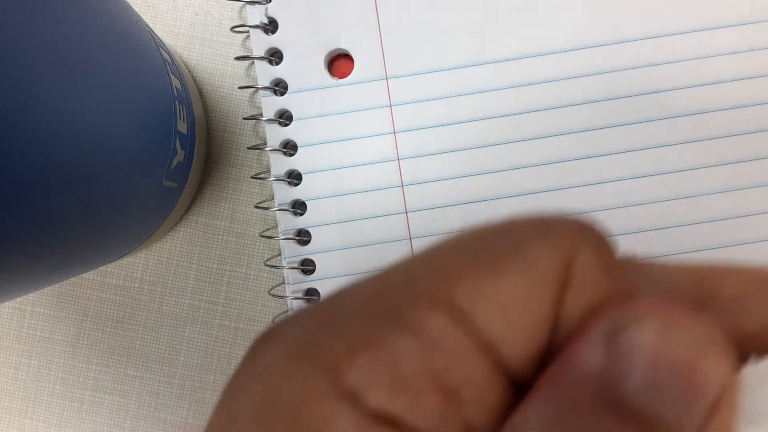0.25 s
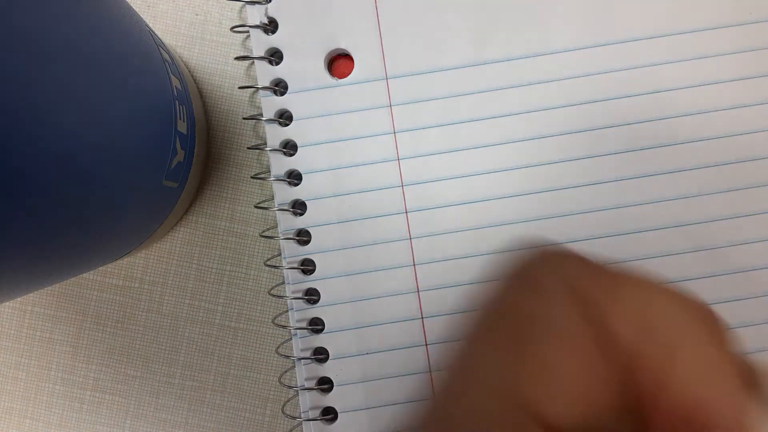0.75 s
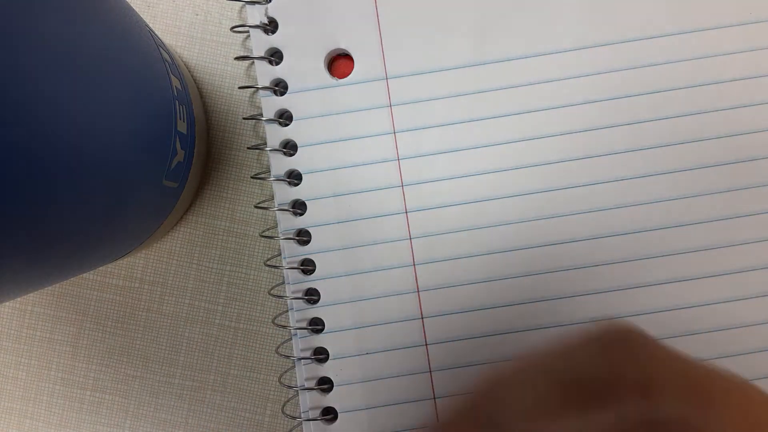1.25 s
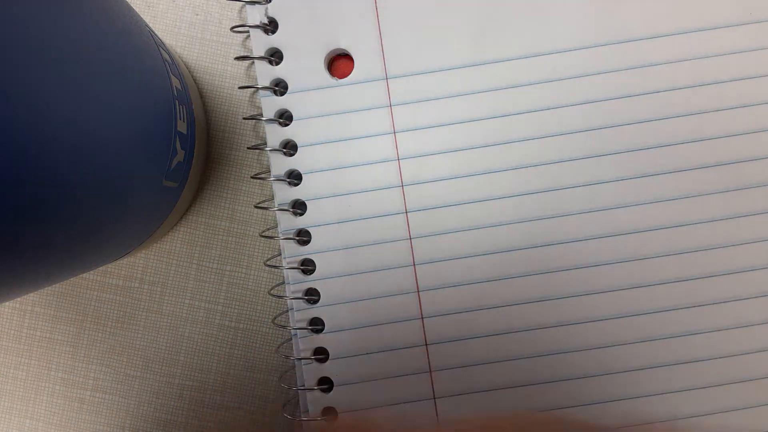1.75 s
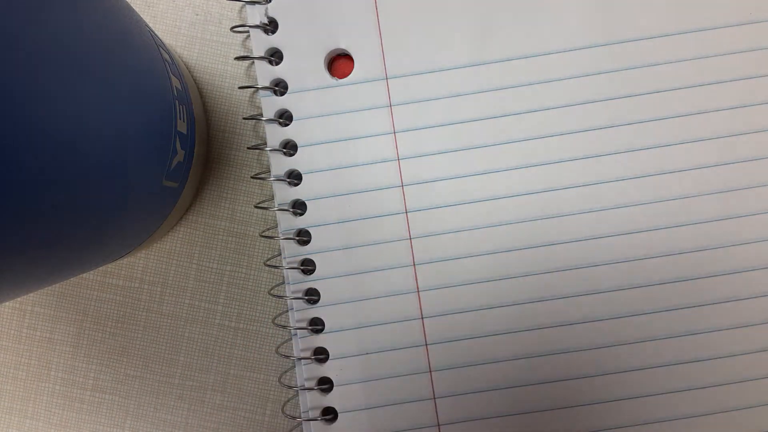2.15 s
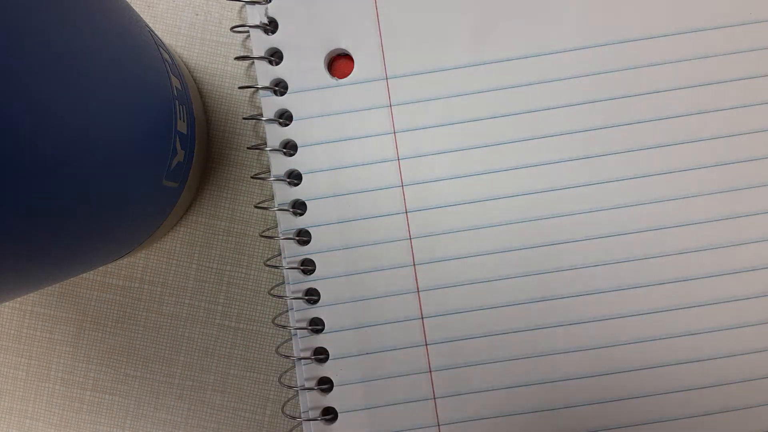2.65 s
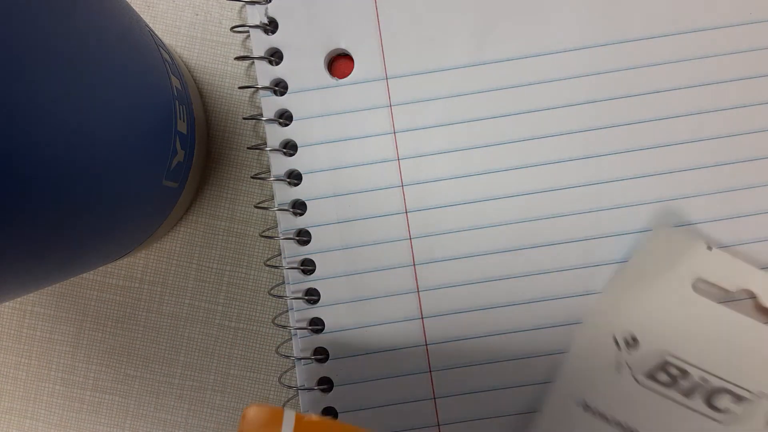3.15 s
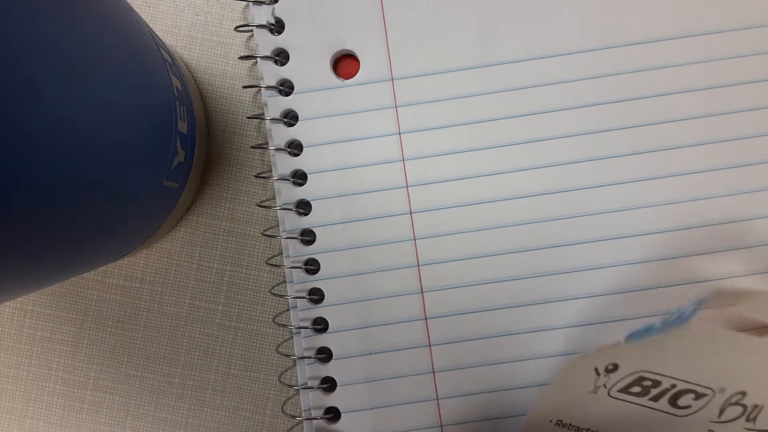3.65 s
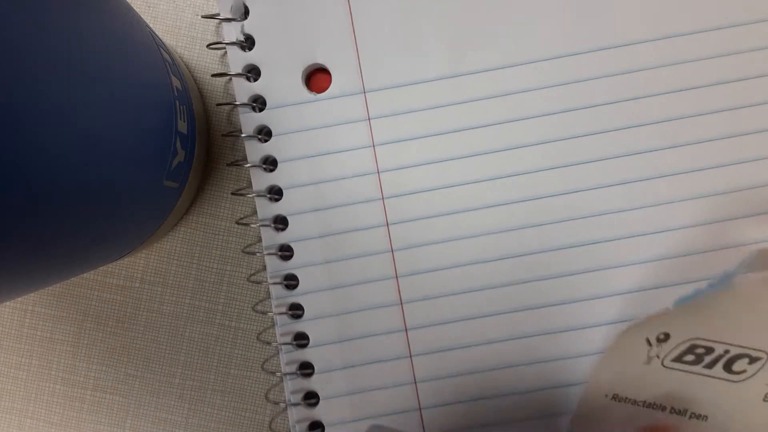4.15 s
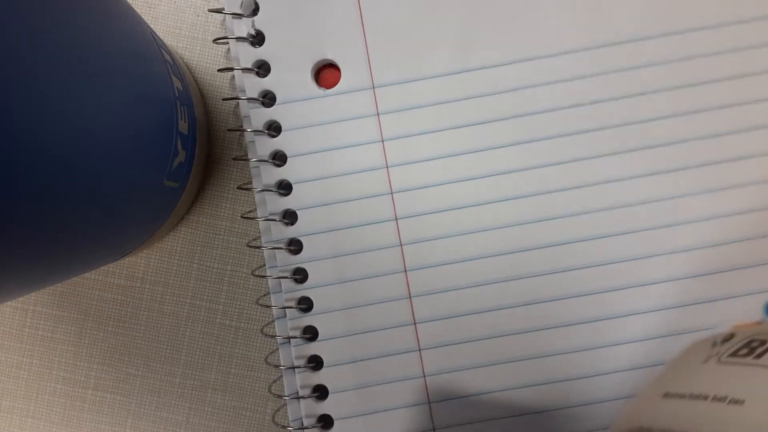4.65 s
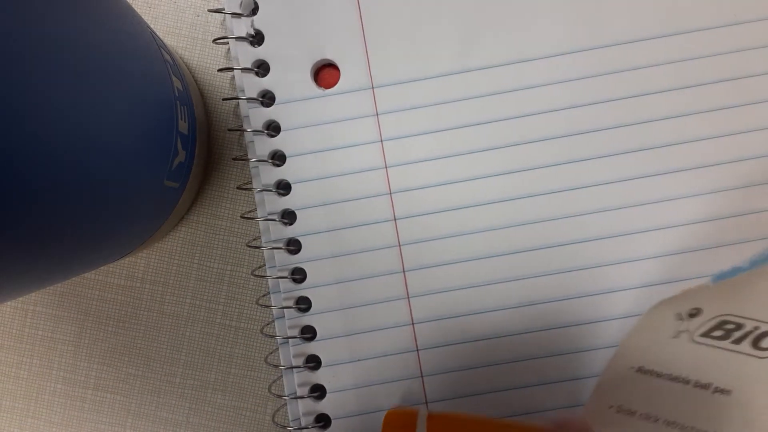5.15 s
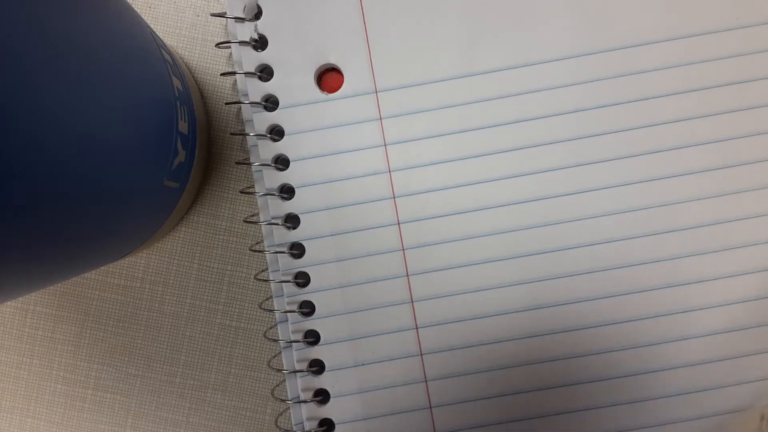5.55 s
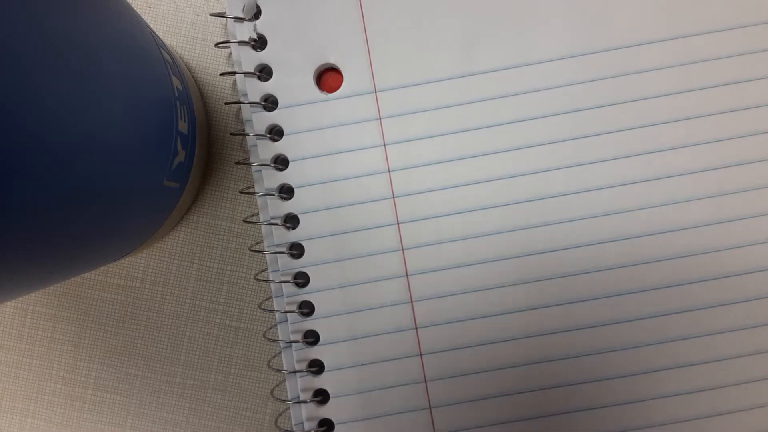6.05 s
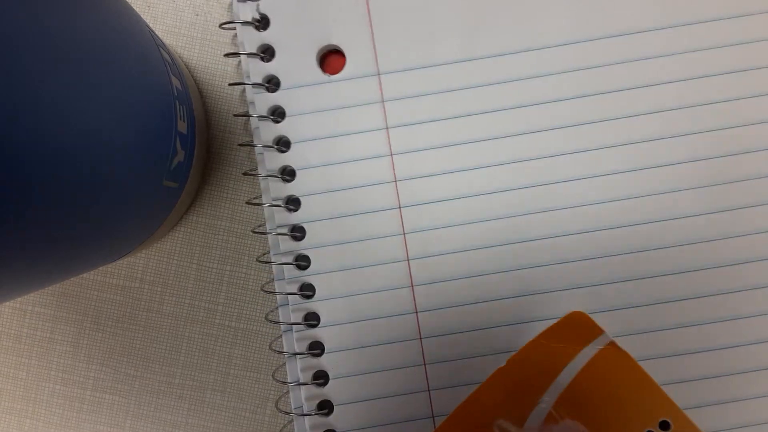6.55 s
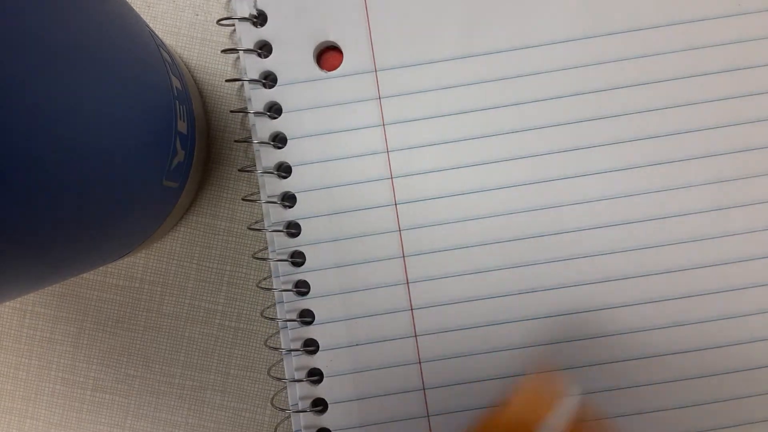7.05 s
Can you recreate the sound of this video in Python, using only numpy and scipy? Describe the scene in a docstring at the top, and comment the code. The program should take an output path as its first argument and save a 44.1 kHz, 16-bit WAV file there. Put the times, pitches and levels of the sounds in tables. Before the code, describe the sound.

Close handling of a card-backed plastic pack on a desk. Fibrous tearing comes first, then sparse crinkles, dry scuffs and bright clicks of buckling plastic. The snapping grows into a dense flurry midway, some hits overloading the microphone into soft low thumps. It thins, a second tear bursts out near the end, and a few snaps trail into faint room air. The sound leans right, with short small-room reflections.

```python
"""Hands tear a card-backed plastic blister pack open, close to the right port of a phone over a desk.
Over faint hum and room air, a long rip of card fibres opens the scene, with a first ringing snap and thump.
Then fingers scuff the pack, grains of card rub, dull knocks fall, and plastic snaps, most densely past 4 s.
Some snaps overload the near microphone into a low thump; a small room answers throughout.
A second long rip comes after 6.3 s, then the last snaps and scuffs die down into the room's quiet."""
import sys
import numpy as np
from scipy import signal
from scipy.fft import rfft, irfft
from scipy.io import wavfile
from scipy.ndimage import uniform_filter1d, minimum_filter1d

SR = 44100
rng = np.random.default_rng(int(sys.argv[2]) if len(sys.argv) > 2 else 0)


def unload_wav(signal):
    """Save mono or channel-first audio to the path in sys.argv[1] as 16-bit WAV at rate SR, clipped to [-1, 1]."""
    wavfile.write(
        sys.argv[1],
        SR,
        np.round(np.clip(np.atleast_2d(signal).T, -1, 1) * 32767).astype(np.int16),
    )


N = 322371
TIME = np.arange(N) / SR


def amp(db):
    """Turn decibels into gain."""
    return 10 ** (np.asarray(db) / 20)


def unit(x):
    """Scale a sound to rms 1."""
    return x / np.sqrt(np.mean(x ** 2) + 1e-18)


def curves(table):
    """Join each column of a table by straight lines in time."""
    s, *columns = np.transpose(table)
    return [np.interp(TIME, s, column) for column in columns]


def band(x, low_hz, high_hz, order=2):
    """Keep the sound between two frequencies (Butterworth band-pass)."""
    edges = [low_hz, min(high_hz, SR / 2 - 2000)]
    return signal.sosfilt(signal.butter(order, edges, "band", fs=SR, output="sos"), x)


def fade(t, t60):
    """Die away smoothly, by 60 dB in t60 seconds."""
    return np.exp(-np.log(1000) * t / max(t60, 1e-3))


def add(track, s, sound):
    """Mix a sound into a track, starting at s seconds."""
    i = max(int(s * SR), 0)
    track[i:i + len(sound)] += sound[:max(N - i, 0)]


def walk(rate):
    """Wander between random levels, a new one every 1 / rate s, joined by straight ramps; rms 1."""
    k = max(int(SR / rate), 2)
    steps = np.repeat(rng.standard_normal(N // k + 1), k)
    return unit(uniform_filter1d(steps, k)[:N])


BODY_LOW_HZ, BODY_TOP_HZ, HISS_LOW_HZ = 467, 2186, 6040  # edges of a snap's body, middle and crack
# base ring of a snap with equal body and crack; it doubles with this much more body than crack
SNAP_T60_S, SNAP_T60_DOUBLES_DB = 0.011, 39
# snaps favour the near port more than rubbing does; each dB of body evens this out by so many dB
SNAP_NEAR_DB, SNAP_SPREAD = 2.5, 0.099
# plastic buckling: (t/s, base level/dB, lower panel ring f/Hz, upper panel ring f/Hz,
# body level/dB over the middle, crack level/dB over the middle)
BUCKLES = [(0.1747, -17.5, 1860, 3170, 19, -0.5), (0.3963, -14, 1620, 4230, -6, -9),
           (0.4132, -12.5, 1930, 2780, -8, -23), (0.4449, -18, 1500, 4450, -3, 6),
           (0.4483, -15.5, 2000, 3970, 1, 8), (0.4878, -21.5, 1600, 4380, -2, -1),
           (0.5036, -16.5, 1240, 4300, -10.5, 0.5), (0.8434, -19, 2080, 2880, -1, -8),
           (0.9429, -13, 1320, 3550, -9.5, -13), (1.0701, -13.0, 2050, 3340, -5, 0),
           (1.0972, -18, 1960, 3200, -7, -3), (1.4107, -17, 1460, 2570, -8.5, 8.5),
           (1.432, -29, 1480, 2530, 6, -3), (1.5656, -19.5, 2030, 2300, -1, 4.5),
           (1.6502, -24.5, 2070, 2680, 2, -13), (1.6951, -10, 1370, 6700, 7, 5),
           (1.7239, -16, 2200, 4340, -16, -17), (1.7422, -13.5, 2010, 4440, -1.5, 4.5),
           (1.868, -24, 2080, 3060, 4, -10), (1.8944, -16.5, 1760, 3860, -6, -3),
           (1.8976, -14.5, 1210, 5950, -9.5, 6.5), (2.0029, -11.5, 2090, 2990, -17, -7),
           (2.1491, -14.5, 2060, 3620, -6.5, -15), (2.157, -7.5, 2000, 3600, 5, -6),
           (2.168, -13.5, 1550, 3180, 8, -7), (2.2502, -35.5, 2010, 4460, 0, 1),
           (2.3101, -14.5, 684, 6540, -3, 5), (2.32, -16, 2040, 5130, -9, 6.5),
           (3.0084, -26.0, 1080, 3060, -1, -22), (3.1816, -16, 1270, 2570, -5.5, -14),
           (3.417, -9, 1263, 3280, 11.5, -12), (3.578, -18.5, 610, 2200, 15, -20),
           (3.621, -15.5, 1620, 3010, -1.5, 2.5), (3.663, -11.0, 2060, 4230, -5, -11),
           (3.6844, -11, 1420, 4140, -1, 0), (3.8043, -19, 1240, 4200, -4, -12),
           (3.81, -15, 1330, 4720, 3.5, -4), (3.8516, -24, 1410, 4200, -10, -6),
           (3.8748, -28.5, 1240, 6440, 9.5, 10.5), (3.9258, -15.5, 1250, 3960, -1, -11),
           (4.1634, -17.5, 1170, 3340, 16, 4), (4.1792, -12.5, 1460, 4660, -2, -9),
           (4.218, -14, 1560, 2890, -14, -5), (4.2224, -6.5, 1480, 6300, -30, 8.5),
           (4.2354, -16, 1780, 5950, -5, 1.5), (4.242, -17, 1310, 2870, 6, -9),
           (4.2617, -17.5, 1740, 4410, -20, 0), (4.2656, -12.5, 1810, 3100, -4.5, 3),
           (4.311, -14.5, 1650, 4220, -1.5, 2), (4.3148, -14.5, 1590, 4400, 4.5, 8.5),
           (4.3716, -17.0, 1220, 3980, -5, 1), (4.4124, -12, 1830, 2240, 1, 3),
           (4.428, -15.5, 2100, 3260, -7, -8), (4.4405, -12, 640, 2740, 0.5, 0.5),
           (4.5415, -13.5, 1660, 3950, -1.5, -2.5), (4.5742, -13, 1220, 5100, -5, 1),
           (4.5855, -13.5, 1300, 4110, -2, -1), (4.62, -16.5, 2030, 3390, -4, -3),
           (4.6289, -11, 2060, 2940, 0.5, -4), (4.6615, -9, 2120, 3360, -40.5, -13),
           (4.669, -22, 1110, 2770, -17, -7), (4.752, -25.5, 1990, 3720, 0, -5),
           (4.7591, -11.5, 1750, 3000, -12, -4), (4.7636, -16.5, 2070, 3270, -21, -2),
           (4.8394, -7.5, 1630, 2730, -13, -8), (4.893, -26, 1160, 4470, -13, -11),
           (4.9383, -18, 2020, 3800, -2.5, -15), (5.0384, -21.5, 2010, 3170, 1, 2.5),
           (5.1902, -13.0, 1860, 3400, -1.5, -1), (5.249, -19.5, 1620, 3150, -13, 5),
           (5.418, -21.5, 2000, 2480, -5, -2), (5.4349, -12, 1350, 4400, -9, -5),
           (5.4599, -12.5, 1640, 3850, -21, 4), (5.7216, -20.5, 1460, 2520, -18, -0.5),
           (5.7566, -13.5, 2150, 3600, 2.5, 0.5), (6.1568, -13.5, 2070, 3780, -12.5, 3.5),
           (6.231, -17.0, 1910, 3880, 0.5, -0.5), (6.239, -12.5, 1920, 2840, -8, -10),
           (6.2657, -12.5, 1560, 3690, -12, 0), (6.336, -18, 1960, 2910, -6, -3.5),
           (6.3648, -12, 2020, 2400, 6, 3.5), (6.407, -9.0, 1240, 2960, -1, -4.5),
           (6.5697, -9.5, 1070, 3190, -12, -4), (6.804, -6, 1810, 2220, -6.5, -11.5),
           (6.8421, -17, 2130, 4200, 13, -24), (6.965, -18.5, 2020, 4130, 3.5, 3),
           (7.034, -14, 1950, 4050, -4, -1)]
# where the hands work, for snaps and rubbing: (t/s, near port over far port level/dB)
NEARNESS = [(0, 13), (.32, 13.5), (.6, 10), (1.1, 12.5), (1.6, 9.5), (2.15, 9), (2.55, 8), (3.2, 8),
            (3.9, 8.5), (4.6, 7), (5.2, 11.5), (5.6, 10), (6.2, 8), (6.5, 11.5), (7, 7.5)]


def snaps(ring_db=-2, attack_s=0.0002, body_decay=1.17, crack_decay=0.81, gain_db=1.5,
          cavity_hz=612, cavity_t60=0.022, cavity_db=-22):
    """Each buckle rings two panel modes and the hollow blister under a crack; returns near and far sound."""
    t = np.arange(SR // 25) / SR
    span = SR * .002
    noise = rng.standard_normal((len(BUCKLES), 3, len(t)))
    bodies = band(noise[:, 0], BODY_LOW_HZ, BODY_TOP_HZ, order=3)
    middles = band(noise[:, 1], BODY_TOP_HZ, HISS_LOW_HZ)
    cracks = band(noise[:, 2], HISS_LOW_HZ, 15050, order=3)

    def burst(x, t60):
        """A fast rise and a decay, with the energy of 2 ms at rms 1."""
        y = x * (1 - np.exp(-t / attack_s)) * fade(t, t60)
        return y * np.sqrt(span / np.sum(y ** 2))

    def ring(hz):
        """A steady panel tone at rms 1."""
        return unit(np.sin(2 * np.pi * hz * t))

    cavity = amp(cavity_db) * burst(np.sin(2 * np.pi * cavity_hz * t), cavity_t60)
    near, far = np.zeros(N), np.zeros(N)
    for buckle, body, middle, crack in zip(BUCKLES, bodies, middles, cracks):
        s, db, low_hz, high_hz, low_db, crack_db = buckle
        # broad, dull buckles ring on; small bright creases stop sooner
        t60 = SNAP_T60_S * 2 ** ((low_db - crack_db) / SNAP_T60_DOUBLES_DB)
        low = burst(unit(body) + amp(ring_db) * ring(low_hz), t60 * body_decay) + cavity
        high = burst(unit(middle) + amp(ring_db + 1.0) * ring(high_hz), t60)
        bright = burst(crack, t60 * crack_decay)
        mix = unit(amp(low_db) * low + high + amp(crack_db) * bright)
        snap = amp(db + gain_db) * mix * np.sqrt(span / len(t))
        near_db = np.interp(s, *np.transpose(NEARNESS))
        add(near, s, snap)
        add(far, s, snap * amp(SNAP_SPREAD * low_db - SNAP_NEAR_DB - near_db))
    return near, far


# resonances of the pack under rubbing: (f/Hz, width f/Hz, base level/dB)
PACK = [(601, 120, 11.5), (1140, 91, 1), (1480, 520, 5.5), (2086, 210, 5.5), (3020, 750, 6.5),
        (3880, 755, 5.5), (4230, 390, -2), (11750, 1700, -9.5)]


def rubbing(slip_db=2.5, slip_rate=110, thud_db=-13, grip_db=4, grip_rate=22, crackle_db=-5.5,
            body_hz=660, middle_hz=2000, hiss_hz=6300):
    """Card slides and tears in uneven slips whose grains ring the pack; returns near and far sound."""
    body_gain, middle_gain, hiss_gain = friction()
    level_db = 20 * np.log10(middle_gain)
    fibres = grains(rate=1700, spread_db=3.5, smooth_db=-1) * amp(slip_db * walk(slip_rate))
    card = fibres.copy()
    for hz, width, db in PACK:
        # the shifting grip damps now one resonance, now another
        grip = amp(db + grip_db * walk(grip_rate))
        card += grip * band(fibres, hz - width / 2, hz + width / 2, order=1)
    # slow handling lets single creases stand out; in a fast tear they merge into the hiss
    crease_gain = amp(crackle_db - 0.12 * np.maximum(level_db + 45.0, 0))
    card = unit(card) + crease_gain * crackles()
    body = unit(band(card, body_hz, middle_hz, order=3))
    middle = unit(band(card, middle_hz, hiss_hz, order=3))
    hiss = unit(band(card, hiss_hz, 15500, order=3))
    # the whole pack flexes in the hands with a soft low rustle
    flex = unit(band(rng.standard_normal(N), 290, 620, order=3)) * amp(2.5 * walk(18))
    sound = body_gain * (body + amp(thud_db) * flex) + middle_gain * middle + hiss_gain * hiss
    return sound, sound * amp(-curves(NEARNESS)[0])


HANDLING_BRIGHT_DB = -1
CARD_BODY_DB, BODY_LOSS = -4.5, 0.59  # body over the middle band; dB of body lost per dB of brightness
STROKE_ATTACK_S, STROKE_RELEASE_S = 0.0058, 0.011
# two long rips of the card, one curve each: (t/s, level/dB, brightness level/dB)
RIPS = [
    [(0, -29, 1), (.02, -25.5, -3), (.065, -23, 1.5), (.13, -33.5, 3), (.16, -28.5, 2.5), (.25, -26.5, 1.5),
     (.33, -26, 5), (.37, -44, 2)],
    [(6.33, -37.5, -5), (6.395, -29, -2), (6.41, -18.5, -1), (6.45, -30, 4), (6.49, -22, 1),
     (6.52, -26.5, 4), (6.565, -29.5, 5), (6.62, -61.5, -4)],
]
# strokes of fingers and card sliding over the pack:
# (start t/s, length t/s, level/dB, brightness level/dB)
STROKES = [(0.438, 0.047, -38, -3.5), (0.704, 0.13, -45, 4.5), (.89, .08, -57, 11),
           (0.981, 0.018, -31.5, -7.5), (1.086, 0.07, -33, -4), (1.21, 0.04, -42, 0.5),
           (1.267, .037, -30.5, -4), (1.38, 0.081, -46, -3), (1.474, 0.06, -44, 3), (1.678, 0.13, -52, 2),
           (1.751, 0.017, -34.5, -8.5), (1.897, 0.072, -49, -12), (1.994, 0.046, -51, -15),
           (2.14, 0.027, -28.5, -4.5), (2.379, 0.026, -30, -5), (2.404, 0.1, -35.5, -2),
           (2.521, 0.053, -27.5, -2), (2.632, 0.031, -37, 3), (2.76, 0.064, -39, -2),
           (2.867, 0.038, -34, 2), (2.891, 0.016, -25, -7), (3.019, 0.024, -40, -9),
           (3.073, 0.063, -37, -2.5), (3.213, .04, -38, -0.5), (3.261, 0.039, -32, -4),
           (3.404, 0.019, -34, -5), (3.52, 0.037, -42, 2.5), (3.647, 0.044, -33.5, 1.5),
           (3.682, 0.015, -20, -1), (3.942, 0.065, -40, -3.5), (3.973, 0.082, -39.5, 4.5),
           (4.379, 0.031, -23, -4), (4.412, 0.059, -33.5, 3.5), (4.512, 0.042, -32, 6),
           (4.571, .1, -31.5, 0.5), (4.828, 0.073, -42, -7.5), (4.92, 0.0095, -29, -9.5),
           (5.028, 0.011, -38, -17), (5.174, 0.064, -42.5, 4), (5.265, 0.11, -57.5, 8.5),
           (5.426, 0.075, -34.5, 2), (5.555, 0.014, -29, 1.5), (5.59, 0.0095, -26.5, -1),
           (5.824, 0.01, -28, -2.5), (6.073, 0.1, -46, 3.5), (6.184, .02, -37, -1.5),
           (6.808, 0.06, -46.5, -15.5), (6.874, 0.16, -54, 9), (7.03, 0.049, -57, 6)]
# the pack rustling in the grip between strokes: (t/s, level/dB)
HANDLING = [(0, -70.5), (.45, -54.5), (.56, -52.5), (.9, -52), (1.1, -37), (1.35, -53), (1.45, -62),
            (1.63, -53.5), (1.95, -52), (2.09, -51), (2.2, -50), (2.35, -52), (2.5, -57.5), (2.7, -47),
            (3.35, -45), (3.49, -56), (3.75, -40), (3.9, -52.5), (4.3, -43), (4.85, -46), (5.1, -51),
            (5.5, -48), (5.8, -44), (5.9, -53), (6.04, -52.5), (6.3, -43), (6.7, -49.5), (7.06, -48.5),
            (7.18, -63.5), (7.31, -70)]


def friction():
    """Gains of card body, middle and hiss: grip, rips and strokes add power; bright contact has less body."""
    def power(db, bright_db):
        """Power in the three bands."""
        return amp([db + CARD_BODY_DB - BODY_LOSS * bright_db, db, db + bright_db]) ** 2

    total = power(curves(HANDLING)[0], HANDLING_BRIGHT_DB)
    for rip in RIPS:
        total += power(*curves(rip)) * (TIME >= rip[0][0]) * (TIME <= rip[-1][0])
    t = np.arange(SR // 4) / SR
    for s, length, db, bright_db in STROKES:
        release = np.exp(-np.maximum(t - length, 0) / STROKE_RELEASE_S)
        envelope = np.minimum(t / STROKE_ATTACK_S, 1) * release
        for track, strength in zip(total, power(db, bright_db)):
            add(track, s, strength * envelope ** 2)
    return np.sqrt(total)


def grains(rate, spread_db, smooth_db):
    """Fibres letting go: many tiny clicks, a few much larger, over smooth sliding noise."""
    size = amp(spread_db * np.minimum(rng.exponential(size=N), 5.5))
    clicks = (rng.random(N) < rate / SR) * size * rng.choice([-1, 1], N)
    return unit(unit(clicks) + amp(smooth_db) * rng.standard_normal(N))


def crackles(spread_db=5.0, t60=0.016, count=1000, noise_db=0):
    """Small creases give way at random, each with a size and a pitch of its own."""
    t = np.arange(SR // 100) / SR
    track = np.zeros(N)
    for when, pitch, size in rng.random((count, 3)):
        hz = 900 * 7 ** pitch  # 900 to 6300 Hz
        noise = amp(noise_db) * rng.standard_normal(len(t))
        tick = (np.sin(2 * np.pi * hz * t) + noise) * fade(t, t60)
        add(track, when * N / SR, tick * amp(spread_db * min(-np.log(1 - size), 3)))
    return unit(track)


# moments that overload the near microphone: (t/s, base thump level/dB)
OVERLOADS = [(.175, -8.5), (2.3102, -17), (3.695, -16), (4.2658, -9.5), (4.4118, -15.5), (4.4415, -10),
             (4.5754, -12), (5.1905, -16.5), (6.3654, -16)]


def thumps(ring_hz=64, t60=0.071, push_s=0.0014, push_db=2, cut_hz=24):
    """An overload shoves the near microphone off centre; its low-cut swings back in a few slow cycles."""
    t = np.arange(SR // 8) / SR
    push = -amp(push_db) * np.sin(np.pi * t[t < push_s] / push_s)
    swing = np.sin(2 * np.pi * ring_hz * t + 1.33) * fade(t, t60) * (1 - np.exp(-t / 0.00042))
    track = np.zeros(N)
    for s, db in OVERLOADS:
        add(track, s, amp(db) * np.concatenate([push, swing]))
    return band(track, cut_hz, 16000)


# low bumps of the hands, dull knocks and a few short, weak snaps of the pack:
# (middle t/s, length t/s, base level/dB, centre f/Hz)
KNOCKS = [(0.262, 0.045, -48, 340), (0.701, 0.014, -54, 250), (1.119, .047, -47.5, 380),
          (1.301, 0.014, -51, 448), (1.359, 0.011, -47, 400), (2.17, 0.018, -34, 490),
          (2.251, 0.11, -49, 91), (2.455, 0.23, -55, 69.4), (2.556, 0.07, -48, 292),
          (2.794, 0.0037, -40, 1030), (2.958, 0.0029, -33, 1350), (3.045, 0.028, -47, 1050),
          (3.095, 0.037, -48, 109), (3.133, 0.032, -45, 1100), (3.306, 0.0044, -37.5, 1590),
          (3.361, 0.011, -45.5, 1090), (3.782, 0.059, -47.5, 121), (4.394, 0.0064, -28.5, 467),
          (4.352, 0.0067, -39, 1350), (4.462, 0.003, -32.5, 610), (5.839, 0.0054, -37, 404),
          (6.141, 0.0085, -45.5, 478), (6.497, 0.0099, -28.5, 940), (6.846, 0.0074, -27, 1125)]


def knocks():
    """Low bumps, dull knocks and short, weak snaps: swells of noise, each over one and a half octaves wide."""
    t = np.arange(SR // 2) / SR - 1 / 4
    track = np.zeros(N)
    for s, length, db, hz in KNOCKS:
        swell = np.exp(-2 * (t / length) ** 2)
        noise = unit(band(rng.standard_normal(len(t)), hz / 2.23, hz * 1.42, order=3))
        add(track, s + t[0], amp(db + 7.0) * swell * noise)
    return track


def far_port(straight, scattered, low_db=-1, straight_db=-30, scattered_db=-2, split_hz=900):
    """The left port hears late: low sound bends round the phone, treble comes mostly by scattering."""
    bent = amp(straight_db) * straight + amp(low_db) * band(straight, 60, split_hz, order=1)
    diffuse = band(scattered, 600, 20000, order=1)
    sound = bent + amp(scattered_db) * diffuse
    lag = 13  # samples
    return np.concatenate([np.zeros(lag), sound[:-lag]])


def room(x, low_t60=0.13, high_t60=0.27, low_db=0, high_db=-3, build_s=0.0014, delay_s=0.005):
    """A small room: a diffuse tail builds up within a few milliseconds, and its treble lasts longest."""
    t = np.arange(SR // 2) / SR
    low = band(rng.standard_normal(len(t)), 150, 4100, order=1) * fade(t, low_t60)
    high = band(rng.standard_normal(len(t)), 3900, 14000, order=1) * fade(t, high_t60)
    build = 1 - np.exp(-np.maximum(t - delay_s, 0) / build_s)
    response = (amp(low_db) * low + amp(high_db) * high) * build
    return signal.fftconvolve(x, response / np.linalg.norm(response))[:N]


def coloured(points):
    """Shape noise to a spectrum of (f/Hz, level/dB) points, at rms 1."""
    hz, db = np.transpose(points)
    f = np.maximum(np.arange(N // 2 + 1) * SR / N, 1)
    gain = amp(np.interp(np.log(f), np.log(hz), db))
    return unit(irfft(rfft(rng.standard_normal(N)) * gain, N))


AIR_DB, FLOOR_SPLIT_HZ = -59, 520  # level before filtering; where shared bass gives way to separate hiss
# spectrum of the room air: (f/Hz, relative level/dB)
AIR = [(20, -31.5), (40, -7), (65, -4.5), (130, 4), (220, -0.5), (420, -2.5), (500, -13), (750, -13),
       (1500, -44), (4000, -53), (16000, -45)]
# mains and fan hum, with slightly wavering pitch: (f/Hz, level/dB in the right channel)
HUM = [(59.5, -66), (119.5, -65), (414.5, -66.5)]


def background(left_db=-2.5):
    """Room air is shaped noise and hum is sines; both ports share the bass, but not the hiss."""
    hum = sum(amp(db) * unit(np.sin(2 * np.pi * hz * TIME + 3.67 * walk(2.2))) for hz, db in HUM)
    bass = hum + amp(AIR_DB) * band(coloured(AIR), 18, FLOOR_SPLIT_HZ)
    left, right = (amp(AIR_DB) * band(coloured(AIR), FLOOR_SPLIT_HZ, 17000) for _ in range(2))
    return np.array([amp(left_db) * bass + left, bass + right])


def scene(room_left_db=-9, room_right_db=-9.5, knock_left_db=-8):
    """The pack is beside the right port; its far side radiates its own sound; both ports hear the room."""
    near, far = np.add(snaps(), rubbing())
    # same snaps and strokes, with freshly drawn grains, crackles and noise
    scattered = np.add(snaps(), rubbing())[1]
    dull = knocks()
    left = far_port(far, scattered) + amp(knock_left_db) * dull + amp(room_left_db) * room(far)
    right = near + thumps() + dull + amp(room_right_db) * room(far)
    return np.array([left, right]) + background()


TOP_HZ = 16000


def record(dry, ceiling=0.99, hold_s=0.00067):
    """A fast limiter ducks both channels together at peaks over the ceiling, and the top is cut."""
    hold = max(int(hold_s * SR), 2)
    gain = np.minimum(1, ceiling / (np.abs(dry).max(axis=0) + 1e-9))
    gain = uniform_filter1d(minimum_filter1d(gain, hold), hold)
    steep = signal.ellip(10, .2, 80, TOP_HZ, fs=SR, output="sos")
    return signal.sosfilt(steep, dry * gain)


dry = scene()
out = record(dry)
unload_wav(out)
```